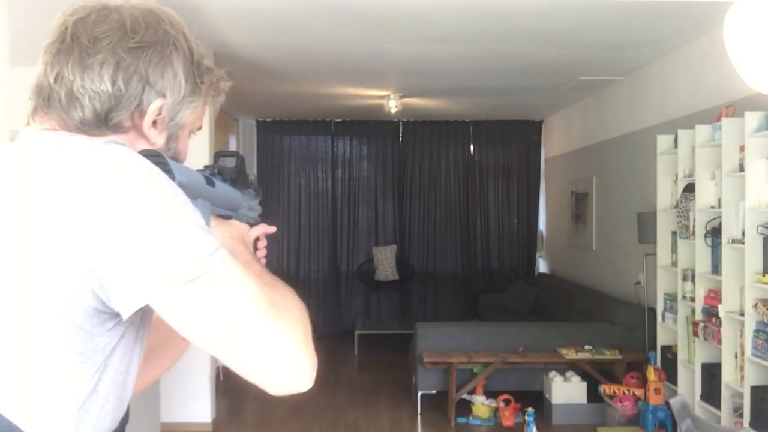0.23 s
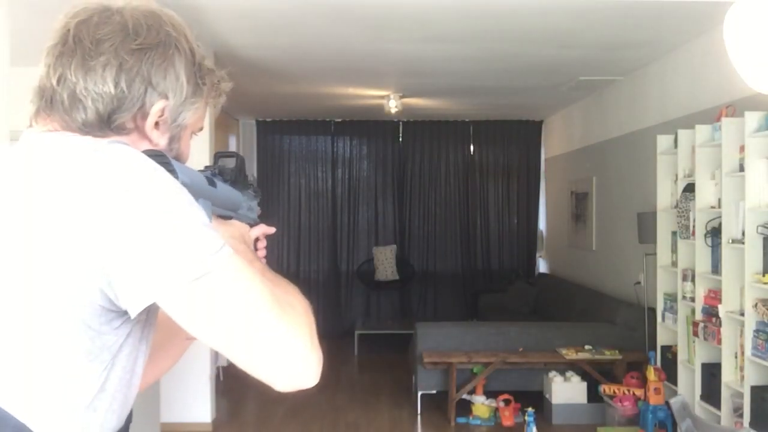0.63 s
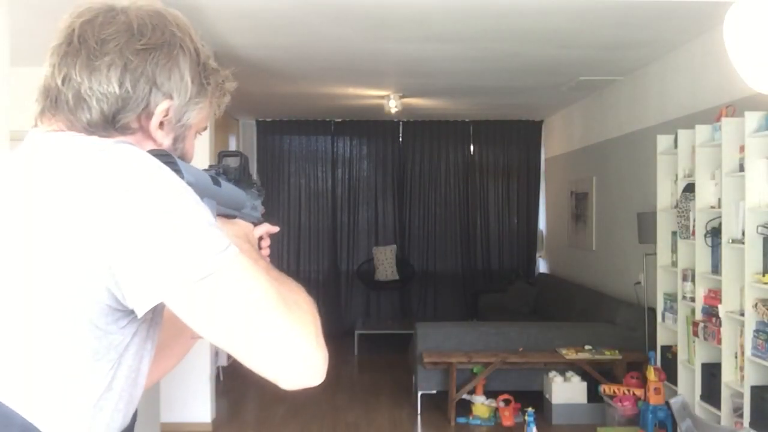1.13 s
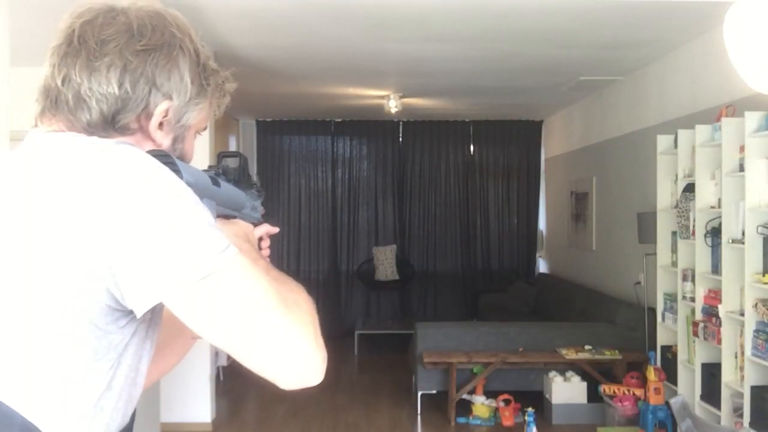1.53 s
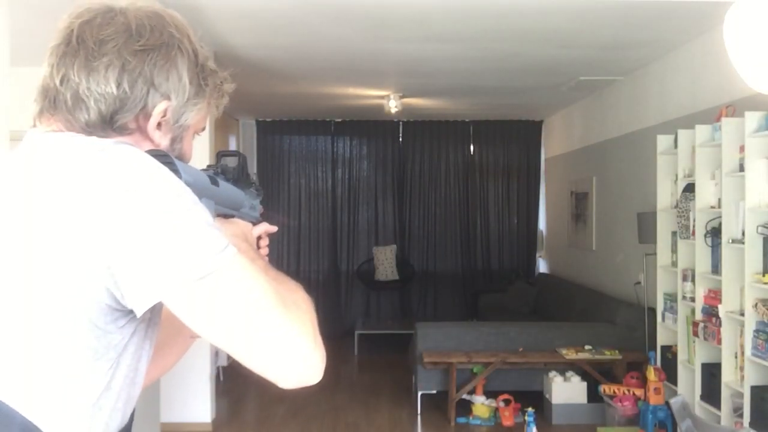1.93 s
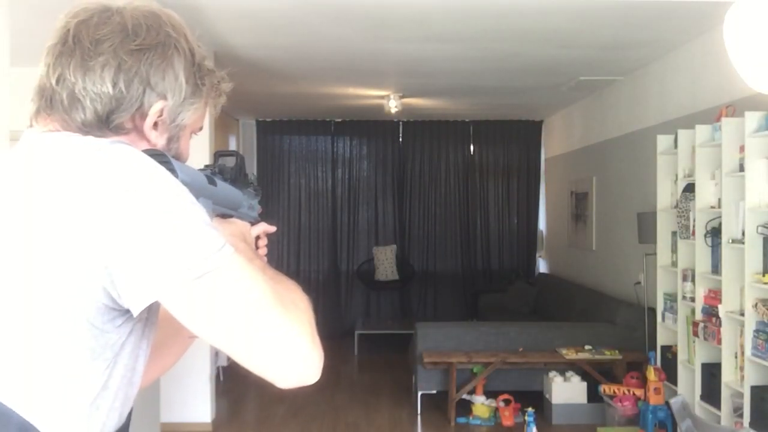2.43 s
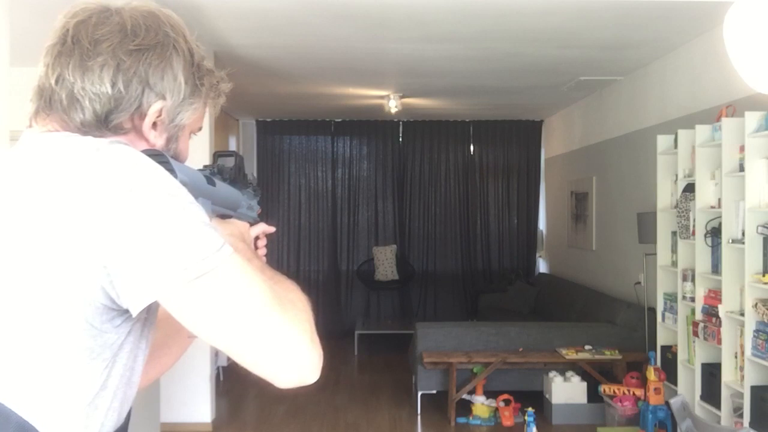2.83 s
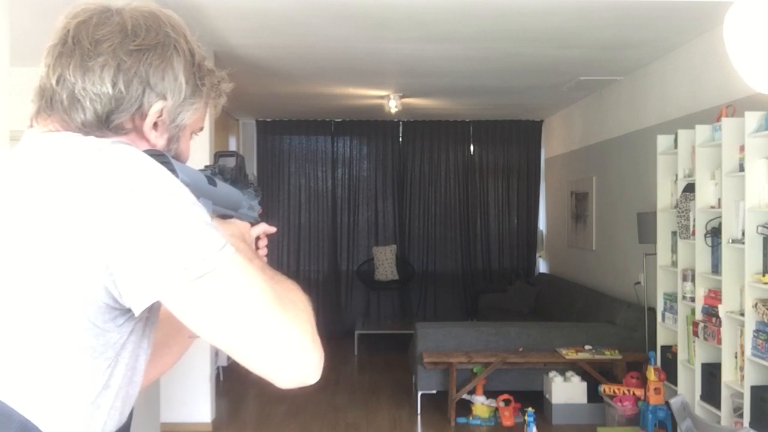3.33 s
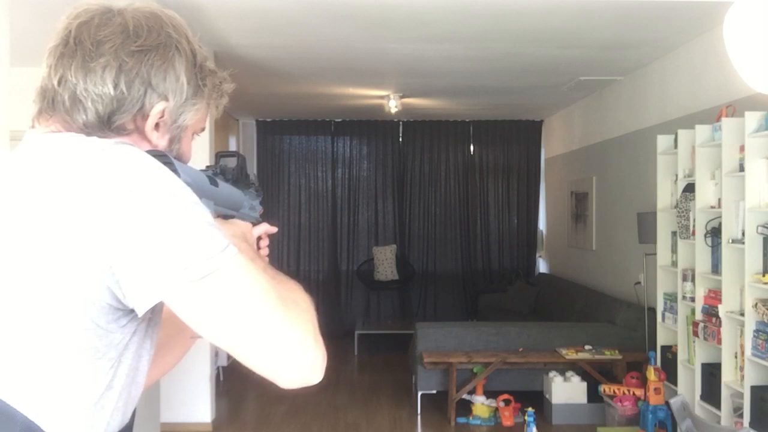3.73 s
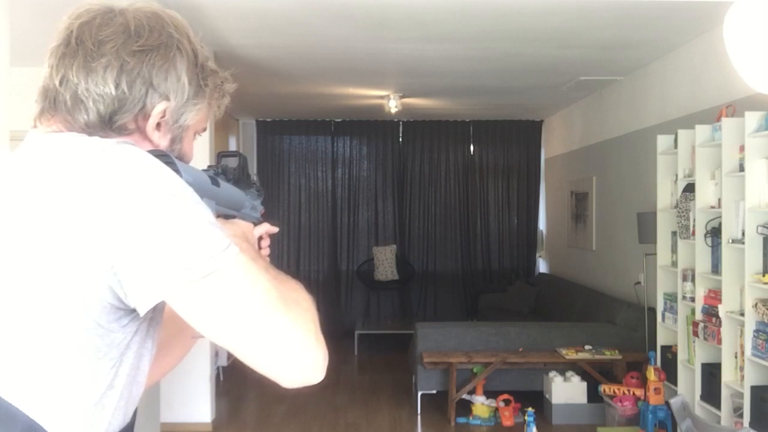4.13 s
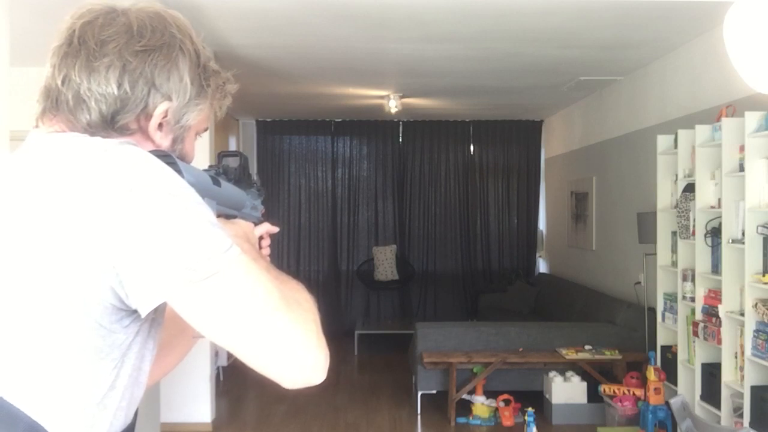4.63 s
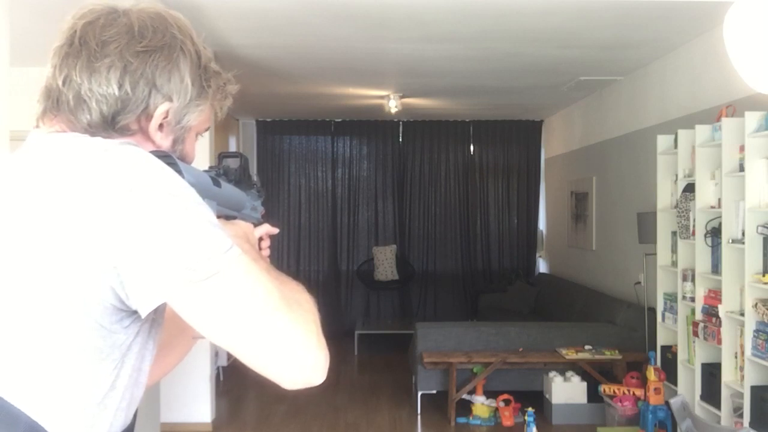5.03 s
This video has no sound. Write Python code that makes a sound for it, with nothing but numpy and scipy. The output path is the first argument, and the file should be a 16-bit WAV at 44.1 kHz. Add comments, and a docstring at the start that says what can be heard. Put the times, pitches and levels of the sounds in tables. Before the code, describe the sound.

A toy air blaster beside the microphone shoots five foam darts across an echoing living room, cycles once empty, then hisses again.

```python
"""A living room with a faint appliance hum that swells now and then, and an early click of a trigger.
An air-powered toy blaster next to the microphone then fires five darts across the room. Each shot is shaped
noise and decaying sines: trigger click, puff of air that rings the barrel, pop of the dart, hard clack of
the bolt; the darts thud against the far end and drop. It cycles once more with an empty barrel, which hisses
and rings, and one more puff starts at the end. Dense echoes follow all but the rings of barrel and target."""
import sys
import numpy as np
from scipy import signal
from scipy.fft import rfft, irfft
from scipy.io import wavfile
from scipy.ndimage import uniform_filter1d

SR = 44100
rng = np.random.default_rng(int(sys.argv[2]) if len(sys.argv) > 2 else 0)


def wav_out(sig):
    """Save sig, one row per channel (or a flat mono array), as 16-bit PCM at SR to the path in sys.argv[1]."""
    wavfile.write(sys.argv[1], SR, np.round(np.clip(np.atleast_2d(sig).T, -1, 1) * 32767).astype(np.int16))


N = 233289
TIME = np.arange(N) / SR   # seconds

# All levels in the tables are relative: most layers are scaled again where they are mixed.
# The valve opens. Each row: start in seconds, level of the air rush in dB, level of the barrel ring in dB.
PUFF_EVENTS = [(1.570, -10, -14), (2.056, -15.5, -13.5), (2.5765, -14, -13.5), (3.0823, -14, -15),
               (3.5585, -15, -15), (4.037, -29, -29.5), (5.2535, -46, -34.5)]
# The bolt slams against its stop. Each row: start in seconds, level in dB, ring of the empty barrel in dB.
CLACK_EVENTS = [(1.602, -4, -54.5), (2.084, -5.5, -50), (2.606, -4.5, -44.5), (3.111, -5, -38),
                (3.588, -4.5, -39.5), (4.2315, -2.5, -16), (4.3675, -16.5, -35)]
# Darts land at the far end. Each row: start in seconds, level in dB, ring of the struck spot in dB.
THUD_EVENTS = [(1.72, -11, -18), (1.786, -16, -28.5), (2.217, -8.5, -25.5), (2.743, -15, -19.5),
               (2.777, -13.5, -29), (3.254, -11.5, -17), (3.289, -13.5, -44), (3.724, -15, -16.5),
               (3.751, -10, -39.5)]
# Spectrum of the puffs and of the noise ahead of them. Each row: frequency in Hz, density in dB per Hz.
RUSH_SPECTRUM = [(25, -21), (55, -4), (90, -1.5), (200, 0), (400, 0), (700, -5), (1200, -7), (2100, -2),
                 (3400, -10.5), (5500, -6), (8000, -18), (12500, -21), (16000, -29.5)]


def from_db(db):
    """Amplitude factor of a level in dB."""
    return 10 ** (np.asarray(db) / 20)


def rms_one(x):
    """Scale to an rms of 1."""
    return x / np.sqrt(np.mean(x ** 2) + 1e-20)


def at_hz(points, hz):
    """Read a table along a log-frequency axis."""
    table = np.array(points)
    return np.interp(np.log(hz + 1e-9), np.log(table[:, 0]), table[:, 1])


def through(x, response):
    """Convolve with an impulse response, cut to the length of the scene."""
    return signal.fftconvolve(x, response)[:N]


def colour(x, tone, size=8192):
    """Causal (minimum-phase) filter with the given spectrum; white noise keeps its power."""
    log_gain = np.log(from_db(at_hz(tone, np.fft.rfftfreq(size, 1 / SR))))
    cepstrum = irfft(log_gain)
    # folding the cepstrum onto positive time makes the filter minimum-phase
    cepstrum[1:size // 2] *= 2
    cepstrum[size // 2 + 1:] = 0
    response = irfft(np.exp(rfft(cepstrum)))
    return through(x, response / np.linalg.norm(response))


def resonate(x, peaks):
    """Parallel resonances of the given centre, width and gain."""
    out = 0
    for hz, width, db in peaks:
        b, a = signal.iirpeak(hz, hz / width, fs=SR)
        out = out + from_db(db) * signal.lfilter(b, a, x)
    return out


def drift(rate_hz):
    """Slow random wander with an rms of 1."""
    knots = rng.standard_normal(int(N / SR * rate_hz) + 2)
    return rms_one(np.interp(TIME * rate_hz, np.arange(len(knots)), knots))


def strikes(rows, column=1):
    """One impulse per row, as strong as the dB in that column."""
    out = np.zeros(N)
    for row in rows:
        out[round(row[0] * SR)] += from_db(row[column])
    return out


def bursts(rows, length_s, squareness=1, rise_s=0.00028, count=6):
    """A short, spectrally even burst of noise per row; a squarer one holds its level and then stops."""
    t, out = TIME[:SR // 4], np.zeros(N + SR)
    envelope = np.exp(-(t / length_s) ** squareness) * (1 - np.exp(-t / rise_s))
    for s, db, *_ in rows:
        burst = envelope * rng.standard_normal(len(t))
        for _ in range(count):   # in turn, flatten the spectrum and restore the envelope
            burst = irfft(np.exp(1j * np.angle(rfft(burst))), len(t))
            local_rms = np.sqrt(uniform_filter1d(burst ** 2, size=48) + 1e-12)
            burst = envelope * burst / local_rms
        out[round(s * SR):][:len(t)] += from_db(db) * burst
    return out[:N]


def ring(hits, modes, swell_s=0.0074):
    """Every hit sets decaying sines going, which swell up over a few milliseconds."""
    t, sines = TIME[:SR], 0
    for hz, db, t60 in modes:
        sines = sines + from_db(db - 60 * t / t60) * np.sin(2 * np.pi * hz * t)
    return through(hits, sines * (1 - np.exp(-t / swell_s)))


def room_response(first_echo_s=0.0053, build_s=0.0014):
    """Dense echoes build up into a tail that dies band by band; energy 1."""
    # Decay of the room. Each row: frequency in Hz, time to fall by 60 dB in seconds.
    decay_times = [(100, 0.47), (250, 0.54), (700, 0.46), (2000, 0.5), (5000, 0.51), (8000, 0.39),
                   (15000, 0.39)]
    # What the walls give back. Each row: frequency in Hz, level in dB.
    wall_levels = [(60, -2.5), (250, 2.5), (1000, 2.5), (3000, -1.5), (6000, 0), (13000, -1)]
    t, hz = TIME[:SR], np.fft.rfftfreq(SR, 1 / SR)
    echoes = rfft(rng.standard_normal(SR))
    onset = 1 - np.exp(-np.maximum(t - first_echo_s, 0) / build_s)
    edges, out = np.geomspace(40, 18000, 25), 0
    for low, high in zip(edges, edges[1:]):
        centre = np.sqrt(low * high)
        t60 = at_hz(decay_times, centre)
        decay = np.exp(-np.log(1000) * t / t60)
        band = irfft(echoes * (hz >= low) * (hz < high), SR) * onset * decay
        # a wider or longer-lived band carries more energy
        out = out + from_db(at_hz(wall_levels, centre)) * rms_one(band) * np.sqrt((high - low) * t60)
    return out / np.linalg.norm(out)


def background(waver=0.23, wander_hz=1.1, low_cut_hz=38):
    """Room tone as coloured noise, and an appliance hum as steady sines that waver in pitch and level."""
    # Spectrum of the room tone. Each row: frequency in Hz, density in dB per Hz.
    air_spectrum = [(15, -38.5), (25, -11.5), (49, -0.5), (102, 3.5), (180, -11), (317, -5.5), (384, -15.5),
                    (489, -11.5), (560, -20), (2410, -22), (4870, -28.5), (5730, -27), (10400, -36),
                    (11900, -33), (16000, -45)]
    # Tones of the hum. Each row: frequency in Hz, level in dB rms before the waver.
    hum_tones = [(70.0, -75), (107.7, -73.5), (140.0, -71.5), (2422, -84.5)]
    drone = (323, -69.5)   # the higher tone between its swells, as a row of the same kind
    air = from_db(-59) * colour(rng.standard_normal(N), air_spectrum)
    air = signal.sosfilt(signal.butter(2, low_cut_hz, "high", fs=SR, output="sos"), air)
    hum = 0
    for hz, db in [*hum_tones, drone]:
        phase = 2 * np.pi * np.cumsum(hz + wander_hz * drift(rate_hz=4)) / SR
        level = from_db(db) * np.sqrt(2) * (1 + waver * drift(rate_hz=2.1))
        hum = hum + level * np.sin(phase)
    return air + hum


def swells(width_s=0.037):
    """The higher tone of the hum rises briefly and sinks back, as sines under one bell shape."""
    # Each row: time of the crest in seconds, rms level at the crest in dB, pitch in Hz.
    crests = [(0.09, -57, 310), (0.258, -55.5, 311), (0.376, -58, 327), (0.587, -56, 329),
              (0.815, -59.5, 326), (1.315, -58.5, 311), (2.482, -52, 319), (4.792, -62, 318),
              (5.042, -58.5, 327), (5.152, -55.5, 323)]
    out = 0
    for s, db, hz in crests:
        t = TIME - s
        bell = np.exp(-(t / width_s) ** 2)
        out = out + from_db(db) * bell * np.sqrt(2) * np.sin(2 * np.pi * hz * t)
    return out


def darts():
    """Far off, foam darts land with a dull thud of noise; softer bumps follow as they drop."""
    # Spectrum of a thud. Each row: frequency in Hz, density in dB per Hz.
    thud_spectrum = [(25, -27), (110, 1), (250, -5), (450, -2), (800, 0), (1150, -6), (1500, -5),
                     (2100, -3.5), (3000, -11), (6000, -18.5), (15000, -42.5)]
    # Dull bumps of dropping darts. Each row: start in seconds, level in dB.
    drops = [(1.835, -41), (2.322, -31), (2.842, -26.5), (3.345, -32.5), (3.815, -33)]
    # Spectrum of a bump. Each row: frequency in Hz, density in dB per Hz.
    bump_spectrum = [(25, -22), (100, -1), (220, 3.5), (420, -7.5), (700, -1), (1300, -14), (1900, -23),
                     (3200, -13.5), (6000, -26.5), (15000, -45)]
    thud = colour(bursts(THUD_EVENTS, length_s=0.014), thud_spectrum)
    bump = colour(bursts(drops, length_s=0.021, squareness=1.7), bump_spectrum)
    return from_db(-12) * thud + from_db(-6) * bump


def target():
    """The spot that the darts hit rings briefly and hollowly in its own modes."""
    # Each row: frequency in Hz, level in dB, time to fall by 60 dB in seconds.
    spot_modes = [(692, 2.5, 0.11), (733, 1.5, 0.12), (1163, -7, 0.13), (1510, -19.5, 0.125),
                  (1884, -9, 0.082), (2100, -12, 0.078)]
    return from_db(1) * ring(strikes(THUD_EVENTS, column=2), spot_modes)


def hands():
    """The shell shifts in the hands: soft, low knocks against the grip."""
    # Each row: start in seconds, level in dB.
    knocks = [(4.217, -23), (4.629, -40.5), (5.025, -43)]
    # Spectrum of a knock. Each row: frequency in Hz, density in dB per Hz.
    knock_spectrum = [(25, -22), (110, 0), (250, 0), (420, 1), (700, -2), (1300, -3), (1800, -21),
                      (3200, -21), (6000, -36), (15000, -50)]
    knock = bursts(knocks, length_s=0.047, squareness=1.3, rise_s=0.0026)
    return from_db(-3.5) * colour(knock, knock_spectrum)


def ticks():
    """Brief bright contacts of small plastic parts."""
    # Each row: start in seconds, level in dB.
    contacts = [(2.2596, -25.5), (2.8425, -46), (3.35, -45), (3.769, -37.5), (3.808, -43)]
    # Spectrum of a tick. Each row: frequency in Hz, density in dB per Hz.
    tick_spectrum = [(500, -16), (2000, -11), (4500, -7), (8000, -10), (10300, -8), (11400, 3), (12500, -7),
                     (16000, -13)]
    return from_db(3) * colour(bursts(contacts, length_s=0.0027), tick_spectrum)


def trigger():
    """Small clicks of the trigger, each trailing off in a light scrape."""
    # Each row: start in seconds, level in dB.
    pulls = [(0.335, -54.5), (1.5138, -34), (1.5307, -33), (2.5367, -31.5), (3.0267, -32.5), (3.5004, -38),
             (3.9824, -33.5), (5.2204, -32)]
    # Spectrum of click and scrape. Each row: frequency in Hz, density in dB per Hz.
    click_spectrum = [(300, -32), (1000, -24), (1400, 5), (1900, -9.5), (2500, 2.5), (3200, 2.5),
                      (4300, 1.5), (5000, -9.5), (5900, -5.5), (7500, -29.5), (15000, -28.5)]
    click = from_db(-12) * bursts(pulls, length_s=0.006)
    scrape = from_db(-12) * bursts(pulls, length_s=0.039)
    return colour(click + scrape, click_spectrum)


def lead_in(rise_db=12, fade_s=0.004):
    """A faint rush of noise swells around the start of each shot's puff and before the empty clack, then fades."""
    # Each row: start in seconds, length of the swell in seconds, final level in dB.
    rises = [(1.556, 0.018, -30), (2.043, 0.016, -27.5), (2.566, 0.01, -28), (3.073, 0.0062, -28),
             (3.546, 0.0093, -30.5), (4.192, .037, -28)]
    swell = 0
    for s, length, db in rises:
        to_go = s + length - TIME   # seconds until the swell peaks
        rise = from_db(-rise_db * np.maximum(to_go, 0) / length)
        fade = np.exp(np.minimum(to_go, 0) / fade_s)
        swell = swell + from_db(db) * rise * fade * (TIME > s)
    return colour(swell * rng.standard_normal(N), RUSH_SPECTRUM)


def bolt(shell_t60_s=0.43):
    """A few milliseconds of hard chatter at the stop; the shell rings and buzzes, the spring rattles."""
    # Spectrum of the clack. Each row: frequency in Hz, density in dB per Hz.
    clack_spectrum = [(25, -41), (80, -7), (300, -4.5), (600, -3.5), (1000, 0.5), (1700, 4), (3000, 2),
                      (4500, 2.5), (6000, -6.5), (8000, -12), (10000, -13), (13000, -16), (16000, -31)]
    # Modes of the shell, which all die alike. Each row: frequency in Hz, level in dB.
    shell_modes = [(1158, -5.5), (1350, -1), (1553, 0.5), (1670, 0.5), (1775, 2.5), (1960, -6), (2211, -5),
                   (2521, -0.5), (2740, 1), (3115, 0.5), (4188, -0.5), (4423, -7.5), (5509, -8)]
    # Spring and shell rattle. Each row: start in seconds, level in dB.
    shakes = [(4.329, -33.5), (4.368, -27.5)]
    # Spectrum of the rattle. Each row: frequency in Hz, density in dB per Hz.
    rattle_spectrum = [(300, -22), (1100, -7), (1550, -3), (2300, -6), (3600, -7), (4200, 0), (4900, -1),
                       (5700, -4), (6600, -20), (15000, -34)]
    # Resonances of the spring. Each row: frequency in Hz, width in Hz, level in dB.
    spring_resonances = [(2250, 53, 4), (2830, 61, -10), (3680, 28, -16), (4080, 120, 9), (4380, 32, -15),
                         (4810, 36, -13)]
    clack = from_db(2.5) * bursts(CLACK_EVENTS, length_s=0.004, squareness=4)
    buzz = from_db(-11) * bursts(CLACK_EVENTS, length_s=0.02)
    modes = [(hz, db, shell_t60_s) for hz, db in shell_modes]
    shell = from_db(-27) * ring(strikes(CLACK_EVENTS), modes)
    shake = bursts(shakes, length_s=0.085, squareness=1.4)
    rattle = from_db(-2) * colour(shake, rattle_spectrum)
    spring = from_db(-4.5) * resonate(shake, spring_resonances)
    return colour(clack + buzz, clack_spectrum) + shell + rattle + spring


def barrel():
    """Each puff thumps the air column; each bolt strike rings it higher, strongest in the empty cycle."""
    # Modes of the air. Each row: frequency in Hz, level in dB, time to fall by 60 dB in seconds.
    air_modes = [(86.6, -17, 0.3), (143, -14.5, 0.41), (189.3, -11.5, 0.24), (249.5, 2, .21),
                 (339, -3.5, 0.17), (482, -7.5, 0.22), (944, -10, 0.13)]
    # The empty barrel. Each row: frequency in Hz, level in dB, time to fall by 60 dB in seconds.
    empty_modes = [(458, 0.0031, 0.16)]
    thump = from_db(2.5) * ring(strikes(PUFF_EVENTS, column=2), air_modes, swell_s=0.0081)
    return thump + from_db(3.5) * ring(strikes(CLACK_EVENTS, column=2), empty_modes)


def muzzle():
    """Air rushes out and the dart pops free; with no dart the rush is faint and a longer hiss resonates."""
    # Pops, two for the first shot and one for each later dart. Each row: start in seconds, level in dB.
    pops = [(1.5715, -1), (1.5805, -1), (2.0675, -4.5), (2.5875, -10), (3.0926, -9), (3.5703, -6)]
    # Spectrum of the pop. Each row: frequency in Hz, density in dB per Hz.
    pop_spectrum = [(25, -32), (80, -11), (250, -0.5), (700, -5), (1200, -11), (1900, 6.5), (2800, 5),
                    (4500, -9.5), (8000, -27.5), (16000, -32.5)]
    # Air hisses from the empty barrel. Each row: start in seconds, level in dB.
    leaks = [(4.034, -21.5), (5.251, -22.5)]
    # Spectrum of the hiss. Each row: frequency in Hz, density in dB per Hz.
    leak_spectrum = [(100, -16), (800, -18), (1400, -6), (2100, 1.5), (3300, -1), (5700, 3), (8000, -12),
                     (12500, -10.5), (16000, -23)]
    # Resonances of the escaping air. Each row: frequency in Hz, width in Hz, level in dB.
    leak_resonances = [(2000, 58, -0.5), (2480, 65, -6.5), (3450, 30, -4), (4410, 72, 3.5),
                       (5300, 200, -5.5), (5820, 39, -6)]
    puff = bursts(PUFF_EVENTS, length_s=0.022, squareness=1.6, rise_s=0.0012)
    rush = from_db(0.5) * colour(puff, RUSH_SPECTRUM)
    pop = from_db(-6) * colour(bursts(pops, length_s=0.0052, squareness=1.9), pop_spectrum)
    leak = bursts(leaks, length_s=0.075, squareness=1.5, rise_s=0.0073)
    hiss = from_db(-7.5) * colour(leak, leak_spectrum)
    whistle = from_db(3.5) * resonate(leak, leak_resonances)
    return rush + pop + hiss + whistle


def scene():
    """The bolt is next to the microphone, the muzzle points into the room, the darts land far off."""
    near = bolt() + trigger() + lead_in() + ticks() + hands()
    ahead, far = muzzle(), darts()
    # the farther a source, the more of it goes to the room's echoes
    send = from_db(-10.5) * near + from_db(-4) * ahead + far
    # the rings of barrel and target stay dry
    direct = near + from_db(1) * ahead + from_db(-1) * far + barrel() + target()
    echoes = through(send, room_response())
    return (direct + echoes + background() + swells())[None]


def record(dry, cutoff_hz=16000):
    """The loudest peaks are rounded off and the top is cut."""
    rounded = 0.89 * np.tanh(dry / 1.17)
    return signal.sosfilt(signal.ellip(10, 0.2, 80, cutoff_hz, fs=SR, output="sos"), rounded)


dry = scene()
out = record(dry)
wav_out(out)
```